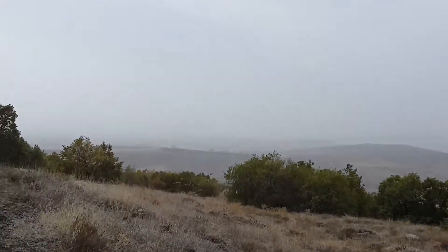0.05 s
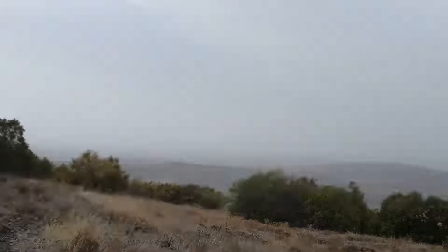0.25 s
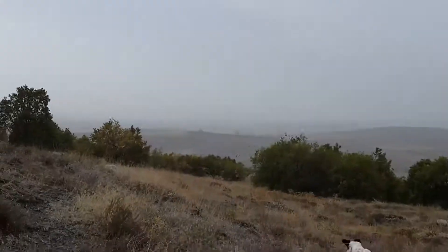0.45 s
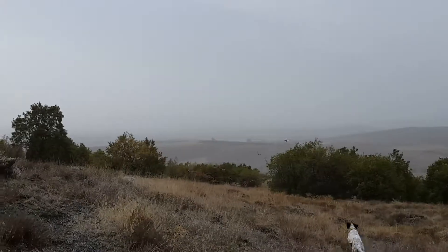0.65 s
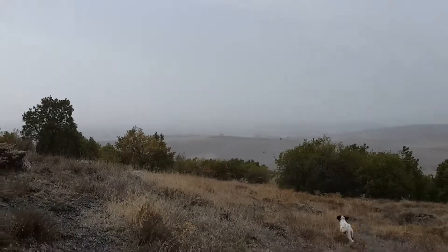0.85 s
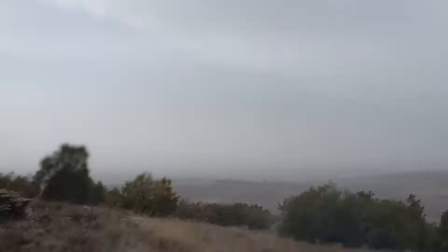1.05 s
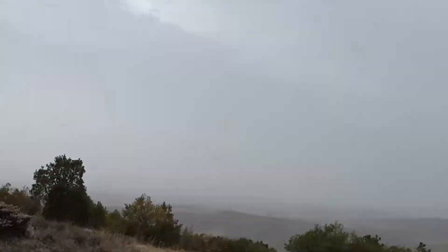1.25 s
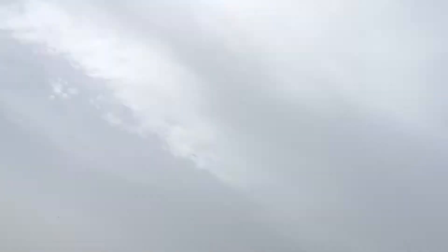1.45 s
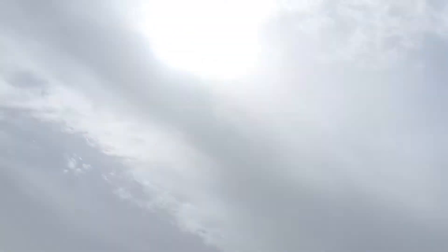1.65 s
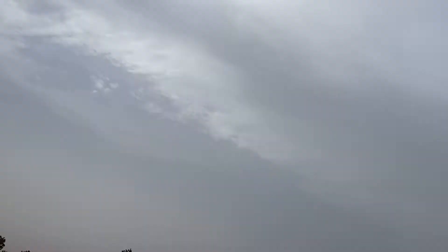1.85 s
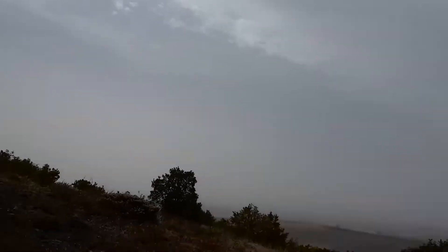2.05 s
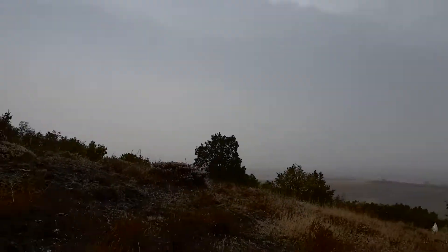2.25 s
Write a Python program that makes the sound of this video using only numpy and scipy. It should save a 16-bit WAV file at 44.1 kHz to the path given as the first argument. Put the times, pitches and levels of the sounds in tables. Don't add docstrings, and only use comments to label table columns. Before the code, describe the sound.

Two close shotgun blasts on an open hillside. Wind thumps and flutters unevenly at both microphones, with grass ticking and faint hiss, until the louder first shot at 0.3 s. It clips harshly; steel clinks and scattered echoes follow to about 0.6. Strong wind slaps continue. The second blast hits at 1.13, with clinks near 1.2 and duller echoes. Wind drops around 1.5, then flutters softly until 2.3, over lowered hiss.

```python
import sys
import numpy as np
from scipy import signal
from scipy.fft import rfft, irfft, next_fast_len
from scipy.io import wavfile
from scipy.ndimage import uniform_filter1d

SR = 44100
rng = np.random.default_rng(int(sys.argv[2]) if len(sys.argv) > 2 else 0)


def to_wav(sig):
    pcm = np.clip(np.atleast_2d(sig), -1, 1) * 32767
    pcm = np.round(pcm).astype(np.int16)
    wavfile.write(sys.argv[1], SR, pcm.T)


def invert_db(x):
    u = np.asarray(x, float) / 20
    return 10 ** u


N = 101429


def unit(x):
    return x / np.sqrt(np.mean(x ** 2) + 1e-20)


def along(points, hz):
    point_hz, value = np.transpose(points)
    return np.interp(np.log(hz + 1), np.log(point_hz + 1), value)


def filtered(x, response):
    size = next_fast_len(N + 8192)
    hz = np.fft.rfftfreq(size, 1 / SR)
    return irfft(rfft(x, size) * response(hz), size)[..., :N]


def sides(pan_db):
    gains = invert_db(np.multiply.outer([.5, -.5], pan_db))
    return gains / gains.mean(axis=0)


def patchy(depth_db, alike):
    z = signal.stft(rng.standard_normal((2, N + 512)), nperseg=256)[2]
    field = uniform_filter1d(rng.standard_normal(z.shape[1:]), 6, 0)
    field = uniform_filter1d(field, 4, 1)
    noise = signal.istft(z * invert_db(depth_db * unit(field)), nperseg=256)[1]
    a, b = noise[:, 256:N + 256]
    angle = np.arccos(np.clip(alike, -1, 1)) / 2
    shared, apart = np.cos(angle) * a, np.sin(angle) * b
    return unit(np.array([shared + apart, shared - apart]))


def puffs(s, hz, size, cycles, sharp, turn):
    steps = np.arange(1600) - 500
    t = steps[None] / SR
    u = t * hz[:, None] / cycles
    bell = np.exp(-np.where(u < 0, sharp * u, u) ** 2)
    wave = bell * np.sin(2 * np.pi * (hz[:, None] * t + turn[:, None]))
    at = np.clip(np.round(s * SR).astype(int)[:, None] + steps, 0, N)
    return np.bincount(at.ravel(), (size[:, None] * wave).ravel(), N + 1)[:N]


GAIN_AFTER_DB = [-8.5, -11.5]
# (pitch [Hz], level [dB per Hz])
FAR_HISS = [(500, -5.5), (900, -2), (2000, -1), (4900, -9), (8000, -14), (15500, -9.5)]
# (pitch [Hz], level [dB per Hz])
NEAR_STALKS = [(400, -120), (800, -0.5), (3000, -4.5), (8000, 3.5), (15500, 6)]


def air():
    t = np.arange(N) / SR
    first, second = SHOTS[0][0], SHOTS[1][0]
    gain_db = np.select([t > second, t > first], GAIN_AFTER_DB[::-1], 0)
    hiss = unit(filtered(patchy(0.88, 0.059), lambda f: invert_db(along(FAR_HISS, f)) * (f > 500)))
    far = invert_db(-48.5 + gain_db) * hiss
    stalks = unit(filtered(patchy(0.67, .1), lambda f: invert_db(along(NEAR_STALKS, f))))
    stalks_db = -45 + 5.5 * np.minimum(t / first, 1)
    return far + invert_db(stalks_db) * (t < first) * stalks


# (time [s], level [dB], left-right [dB], eddy pitch [octaves over EDDY_HZ])
WIND_COURSE = [(0, -44, -16.5, -1.1), (0.221, -27, 11, 0.33), (0.389, -29.5, 0, -0.091),
               (0.63, -39.5, 5.5, 0.57), (0.688, -31.5, -5, 1), (0.852, -31.5, 27, 0.69),
               (0.889, -37, -5, 0.83), (1.003, -27.5, 22.5, 1), (1.091, -30, 0.5, 0.92),
               (1.363, -30.5, -1.5, -0.035), (1.539, -57.5, -10, -0.44), (1.651, -46.5, -3, 0.41),
               (1.719, -45, 0.5, 0.54), (1.769, -34.5, -3, 0.98), (1.859, -36.5, 2, -0.14),
               (1.932, -34, 13.5, 1), (2.062, -41.5, 3, 0.2), (2.3, -34.5, 1, -0.34)]
EDDY_HZ, EDDY_CYCLES, EDDY_SHARP = 213, .95, 1.4
EDDY_SPREAD_DB, EDDY_PITCH_SPREAD, LOUD_IS_HIGHER = 2.5, .36, 0.007


def eddies(octaves):
    ports, count = [], int(240 * N / SR)
    for side in range(2):
        at = (np.arange(count) + rng.random(count)) / count * (N - 1)
        size_db = EDDY_SPREAD_DB * rng.standard_normal(count)
        spread = EDDY_PITCH_SPREAD * rng.standard_normal(count) + LOUD_IS_HIGHER * size_db
        hz = np.clip(EDDY_HZ * 2 ** octaves[at.astype(int)] * np.exp(spread), 70, 800)
        turn = rng.random(count)
        ports.append(unit(puffs(at / SR, hz, invert_db(size_db), EDDY_CYCLES, EDDY_SHARP, turn)))
    return np.array(ports)


# (time [s], peak level [dB], pitch [Hz], left-right [dB])
SLAPS = [(0.008, -22, 191, 5.5), (0.063, -22.5, 181, 28), (0.095, -21.5, 146, 11),
         (0.129, -16.5, 204, -8), (0.151, -20, 199, 27), (0.171, -21, 172, 3), (0.207, -8, 209, 21),
         (0.234, -9.5, 227, 20), (0.267, -12, 171, -0.5), (0.374, -14, 490, -13),
         (0.389, -19, 288, -8), (0.45, -15, 264, 7), (0.505, -16, 248, -2), (0.519, -24.5, 270, -17),
         (0.576, -22.5, 244, 27), (0.603, -23, 202, 22), (0.663, -24.5, 315, -27),
         (0.673, -21, 470, 28), (0.682, -23, 298, 8), (0.692, -28, 290, -10.0), (0.707, -16, 365, 6),
         (0.737, -17.5, 404, 0), (0.765, -19, 402, 13), (0.777, -16.5, 307, 11.0),
         (0.787, -21, 294, 11.5), (0.811, -19.5, 252, 9), (0.823, -15.5, 349, 19),
         (0.831, -20, 297, 29), (0.84, -14, 253, 15), (0.852, -19, 353, 21), (0.888, -8.5, 265, -0.5),
         (0.923, -17.5, 288, 26), (0.935, -18.5, 355, 12),
         (0.956, -22, 317, 22.5), (0.974, -17.5, 435, 29), (0.994, -15, 265, 22),
               (1.005, -13.5, 420, 42), (1.015, -21, 235, 16), (1.032, -20.5, 390, 28),
               (1.046, -20, 227, 5), (1.079, -18.5, 300, 28), (1.087, -16.5, 265, 23),
               (1.236, -20, 270, -11.5), (1.245, -16.5, 297, 21), (1.255, -9.5, 370, 18),
               (1.275, -20, 333, 10), (1.294, -25, 220, 11), (1.325, -20, 308, 16.5),
               (1.35, -20, 182, -3.5), (1.37, -18, 383, 3), (1.446, -25.5, 201, -5),
               (1.478, -31.5, 159, -2), (1.504, -37.4, 167, 2.5), (1.641, -28.5, 185.5, -13),
               (1.661, -33.7, 193, -23), (1.756, -21.5, 206, 31), (1.785, -23.5, 293, -15),
               (1.805, -23.5, 218, 9.5), (1.828, -25.5, 163, -26), (1.915, -19, 285, 12.5),
               (1.931, -21, 194.4, -19), (1.948, -29, 342, 3), (1.976, -19, 228, 22.0),
               (2.02, -22.5, 247, 21.5), (2.061, -26.5, 229, -5), (2.07, -27, 181, -15),
               (2.104, -20.5, 249.4, 22), (2.141, -25.5, 217, 4), (2.18, -25, 217.3, -17),
               (2.201, -32, 180.4, 23), (2.246, -30.4, 157, 7.0), (2.254, -44.5, 215, 34),
               (2.273, -25.5, 211, 14), (2.282, -28, 178, 5.0),
         (0.075, -31, 800, -8.5), (.12, -17.5, 248, 7), (0.197, -13.5, 242, 21), (.597, -23, 704, 24),
            (.997, -18, 813, 33), (1.067, -22, 520, 27), (1.259, -22, 520, 20), (1.886, -30, 463, -14),
            (1.9, -28.5, 380, -3), (1.997, -35, 479, 6), (.737, -24, 720, 8), (1.803, -34, 672, -13)]
SLAP_CYCLES, SLAP_SHARP, SLAP_SHIFT_S, SLAP_DB = 1.016, 3.05, -0.0011, -2
EDGE_CYCLES, EDGE_PITCH, EDGE_TOP_HZ = 2.1, 2.26, 900
EDGE_DB, EDGE_DB_PER_OCTAVE = -19, 7.5


def slaps(octaves):
    s, peak_db, hz, pan_db = np.transpose(SLAPS)
    turn = rng.random((len(s), 2)).T
    edge_db = peak_db + EDGE_DB + EDGE_DB_PER_OCTAVE * octaves[(s * SR).astype(int)]
    edge_hz = np.minimum(EDGE_PITCH * hz, EDGE_TOP_HZ)
    at, ports = s + SLAP_SHIFT_S, []
    for gain, body_turn, edge_turn in zip(sides(pan_db), turn, turn[::-1]):
        body = puffs(at, hz, invert_db(peak_db + SLAP_DB) * gain, SLAP_CYCLES, SLAP_SHARP, body_turn)
        edge = puffs(at, edge_hz, invert_db(edge_db) * gain, EDGE_CYCLES, SLAP_SHARP, edge_turn)
        ports.append(body + edge)
    return np.array(ports)


# (pitch [Hz], level [dB per Hz])
LOW_ROAR = [(25, -23.5), (60, -0.5), (120, 7), (220, -6), (400, -25), (800, -52), (1500, -120)]


def wind():
    s, *columns = np.transpose(WIND_COURSE)
    db, pan_db, octaves = [np.interp(np.arange(N) / SR, s, c) for c in columns]
    flutter = eddies(octaves)
    roar = unit(filtered(patchy(2.9, 0), lambda f: invert_db(along(LOW_ROAR, f))))
    steady = flutter + invert_db(-1) * roar
    gusts = invert_db(db - 2.5) * sides(pan_db) * steady + slaps(octaves)
    return filtered(gusts, lambda f: f * f / (f * f + 16 ** 2))


# (time [s], peak level [dB], length [s], left-right [dB])
TICKS = [(0.04, -49, 0.0071, -9), (0.0886, -27, 0.0073, -8.5), (0.1303, -27, 0.006, -8.5),
         (0.1515, -28, 0.0063, -12.5), (0.1644, -33, 0.0055, -6), (0.1736, -35, 0.0072, -7),
         (0.2236, -27, 0.0041, -9), (0.253, -35, 0.0057, -1), (0.678, -44, 0.0048, 1),
         (0.6944, -45.5, 0.0044, -4), (1.5994, -49, 0.0094, 6), (1.7994, -55, 0.0046, -4),
         (2.1494, -49.5, 0.011, 5.5), (2.2964, -48.5, 0.0065, -2), (.861, -40.5, 0.0011, -2.5),
         (.869, -39.5, .001, -4.5), (.925, -44, 0.00098, -7.5), (.951, -39, 0.0011, -2),
         (.974, -46, 0.0014, -8), (.982, -47.5, .001, -10), (1.02, -42, 0.0012, 1), (1.105, -47, .001, -13),
         (1.973, -43.5, 0.001004, -1), (2.11, -45.5, .001, 3.5)]
# (pitch [Hz], level [dB per Hz])
DRY_GRASS = [(1200, -120), (2500, -13), (5000, 0.5), (9000, -3), (15000, 4)]


def rustle():
    t, shape = np.arange(N) / SR, np.zeros((2, N))
    for s, db, length, pan_db in TICKS:
        bell = np.exp(-((t - s) / np.where(t < s, length / 2.3, length)) ** 2)
        shape += invert_db(db - 3) * sides(pan_db)[:, None] * bell
    return shape * unit(filtered(patchy(2.5, 0.17), lambda f: invert_db(along(DRY_GRASS, f))))


# (arrival time [s], held [s], time to fade by 60 dB [s])
ECHO_TIMES = [(0.377, 0.029, 0.088), (0.42, 0.012, 0.24), (0.464, 0.025, 0.15), (0.516, 0.013, 0.1),
              (0.559, 0.053, 1), (0.729, 0.024, 0.48), (1.212, 0.067, 0.31), (1.303, 0.017, 0.13),
              (1.341, 0.022, 0.097), (1.389, 0.031, 1), (1.551, 0.072, 0.2), (1.689, 0.055, 0.22),
              (1.82, 0.02, 0.53)]
# (level [dB], tilt [dB per octave])
ECHO_COLORS = [(-24.5, -4.5), (-24, -4.5), (-24, -8), (-29.5, -18.5), (-47.5, -12.5), (-47.5, -31),
               (-30.5, -3.5), (-25, -11.5), (-27, -20.5), (-47, -10.5), (-52, -19.5), (-50.5, -8.5),
               (-53, -40)]
SWELL_S = .016
ECHO_LOW_HZ, TILT_FROM_HZ, ECHO_TOP_HZ = 1000, 2650, 13900


def hillside():
    t, out = np.arange(N) / SR, np.zeros((2, N))
    for (s, held, t60), (db, tilt_db) in zip(ECHO_TIMES, ECHO_COLORS):
        swell = np.clip((t - s) / SWELL_S, 0, 1) ** 2
        fade = invert_db(-60 * np.maximum(t - s - SWELL_S - held, 0) / t60)

        def tone(f):
            dull = invert_db(tilt_db * np.log2(1 + (f / TILT_FROM_HZ) ** 2) / 2)
            return dull / (1 + (ECHO_LOW_HZ / (f + 1)) ** 3.5) / (1 + (f / ECHO_TOP_HZ) ** 8)

        out += invert_db(db) * swell * fade * unit(filtered(patchy(2.8, 0.14), tone))
    return out


# (time [s], level [dB], pitch [Hz], left-right [dB])
CLINKS = [
    (0.3751, -8.5, 4990, 14),
    (0.3766, -10.5, 5300, 12.5),
    (0.389, -13, 4640, 11),
    (0.411, -17.5, 2450, 6.5),
    (0.4531, -18.5, 4780, 8),
    (1.201, -14, 4100, 6),
    (1.2243, -12.5, 5300, 7.5),
]


def action():
    out, t = np.zeros((2, N + SR)), np.arange(1500) / SR
    fade = invert_db(-60 * t / .009)
    for s, db, hz, pan_db in CLINKS:
        ring = np.sin(2 * np.pi * hz * t) + 0.11 * rng.standard_normal((2, len(t)))
        start = round(s * SR)
        out[:, start:start + len(t)] += invert_db(db) * sides(pan_db)[:, None] * ring * fade
    return out[:, :N]


# (time [s], level [dB over full scale], overload held [s], time to fade by 60 dB [s], steeper drop
# begins [s after blast])
SHOTS = [
    (0.2961, -4, 0.013, 0.21, 0.09),
    (1.131, -8, 0.014, 0.26, 0.1),
]
LEAD_S, LEAD_DB, END_T60_S = .0016, -20, .05
THUMP_HZ, THUMP_WIDTH_HZ, THUMP_DB = 380, 227, -14.5
SIZZLE_HZ, SIZZLE_LONGER, SIZZLE_DB = 6440, 1.17, 3


def blasts():
    t, out = np.arange(N) / SR, np.zeros((2, N))

    def crack_tone(f):
        return f / (f + 600) / (1 + (f / SIZZLE_HZ) ** 4)

    def sizzle_tone(f):
        return 1 / (1 + (SIZZLE_HZ / (f + 1)) ** 4)

    def thump_tone(f):
        width = 1j * f * THUMP_WIDTH_HZ
        return width / (THUMP_HZ ** 2 - f * f + width)

    for s, db, held, t60, ends in SHOTS:
        lead = invert_db(LEAD_DB) * np.exp(np.minimum(t - s, 0) / LEAD_S)
        ending = invert_db(-60 * np.maximum(t - s - ends, 0) / END_T60_S)
        front = np.where(t < s, lead, ending)
        fade_db = -60 * np.maximum(t - s - held, 0) / t60
        crack = unit(filtered(patchy(1.4, 0.022), crack_tone))
        sizzle = unit(filtered(patchy(2.4, .05), sizzle_tone))
        thump = unit(filtered(patchy(0.5, 0.85), thump_tone))
        low = (crack + invert_db(THUMP_DB) * thump) * invert_db(fade_db)
        out += invert_db(db) * front * (low + sizzle * invert_db(SIZZLE_DB + fade_db / SIZZLE_LONGER))
    return out


def ducking():
    t = np.arange(N) / SR
    ahead_s, fade_s, depth_db = .008, .016, -22
    gain_db = np.zeros(N)
    for s, *_ in SHOTS:
        gain_db += depth_db * np.clip(1 + (t - s + ahead_s) / fade_s, 0, 1) * (t < s)
    return invert_db(gain_db)


# (pitch [Hz], level [dB])
LEFT_HOLE = [(200, 5), (2500, -2), (4700, 5.5), (6400, -3), (9000, -9.5), (15000, -9)]
# (pitch [Hz], level [dB])
RIGHT_HOLE = [(200, 7.5), (2500, -1.5), (4700, -0.5), (6400, -1), (8500, 3), (15000, -8.5)]


def through_ports(x):
    return filtered(x, lambda f: invert_db([along(LEFT_HOLE, f), along(RIGHT_HOLE, f)]))


def scene():
    duck = ducking()
    in_air = blasts() + duck * (hillside() + rustle() + air())
    return through_ports(in_air) + action() + duck * wind()


def low_pass(x):
    return signal.sosfilt(signal.butter(12, 15530, fs=SR, output="sos"), x)


def record(dry):
    top, hardness = .97, 6
    clipped = dry / (1 + np.abs(dry / top) ** hardness) ** (1 / hardness)
    return low_pass(clipped)


dry = scene()
out = record(dry)
to_wav(out)
```